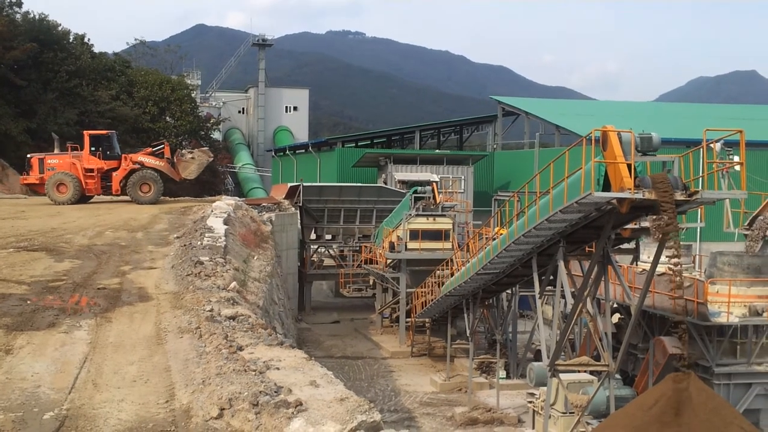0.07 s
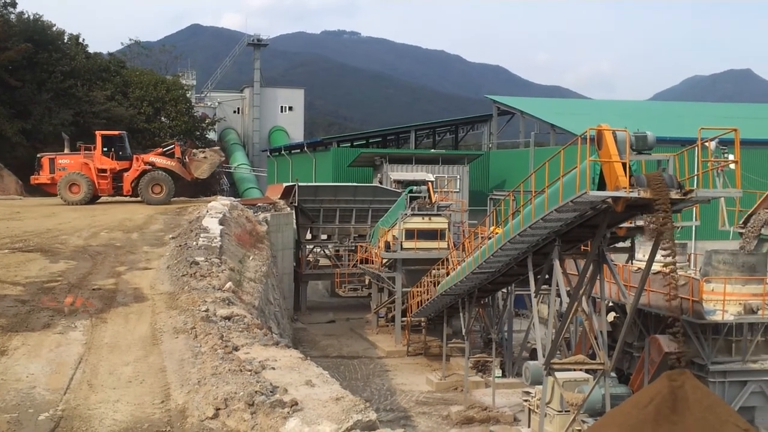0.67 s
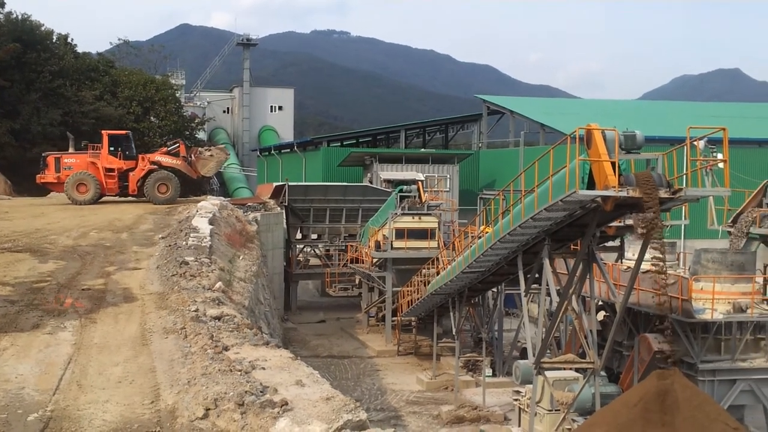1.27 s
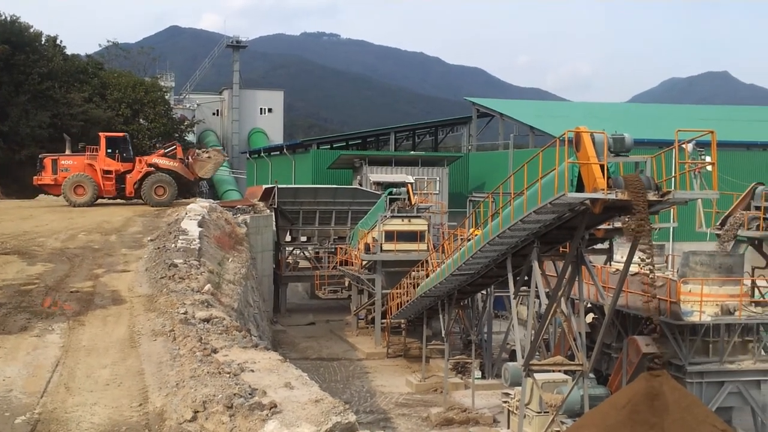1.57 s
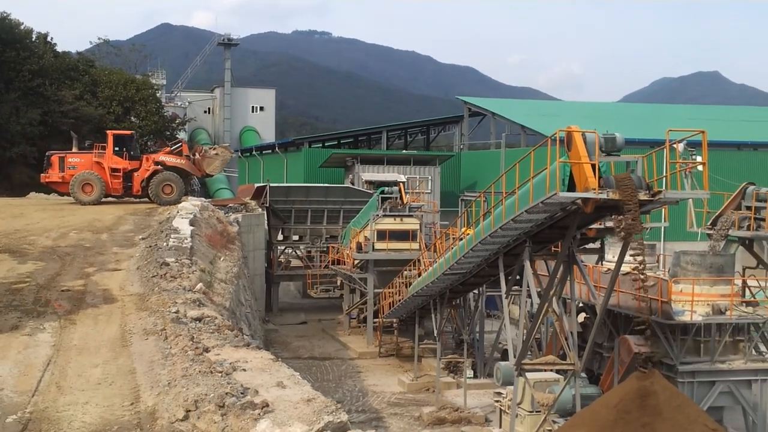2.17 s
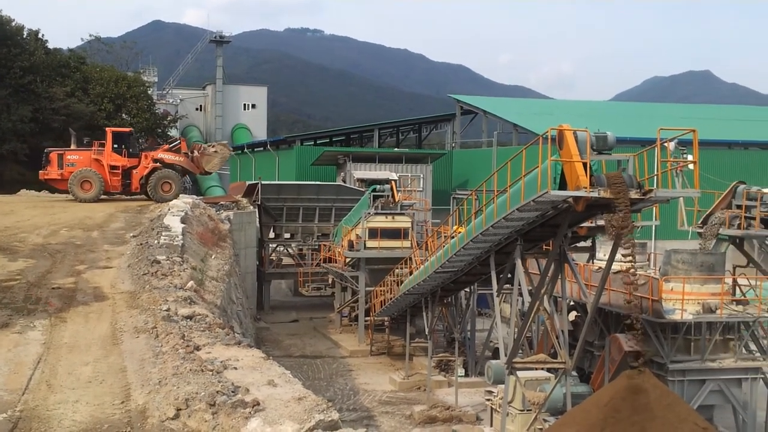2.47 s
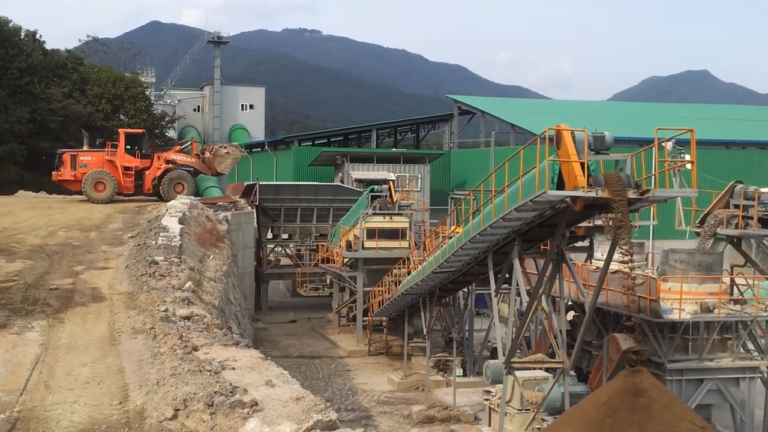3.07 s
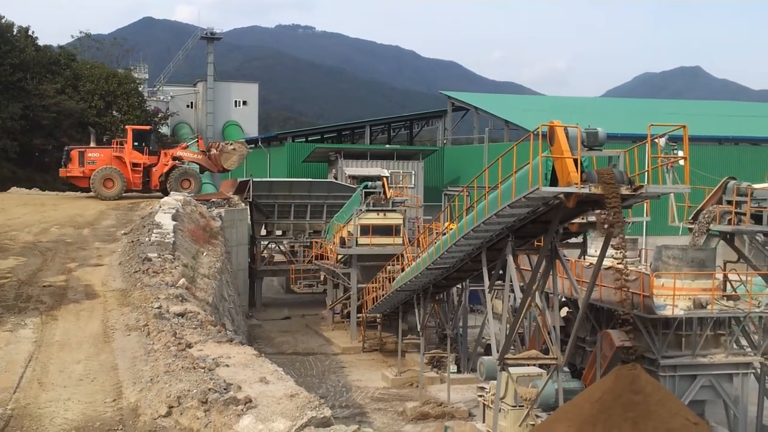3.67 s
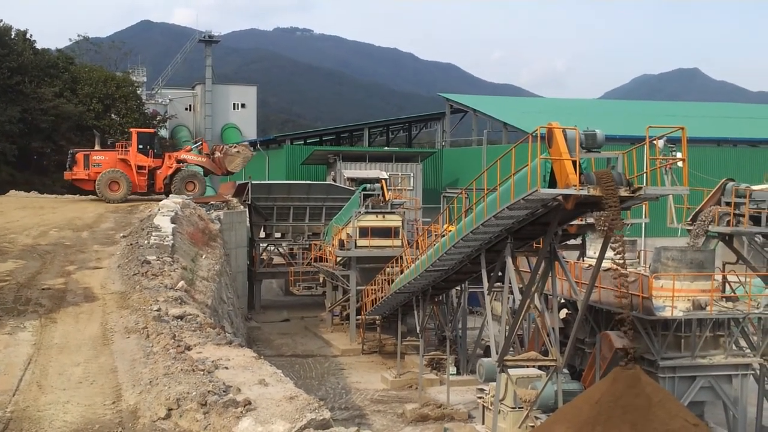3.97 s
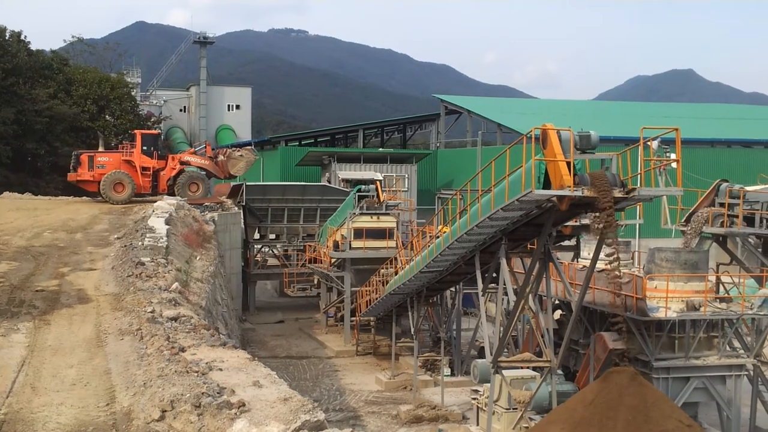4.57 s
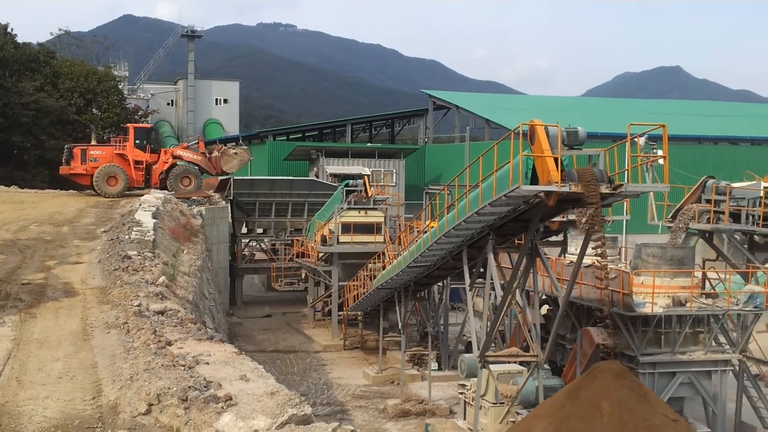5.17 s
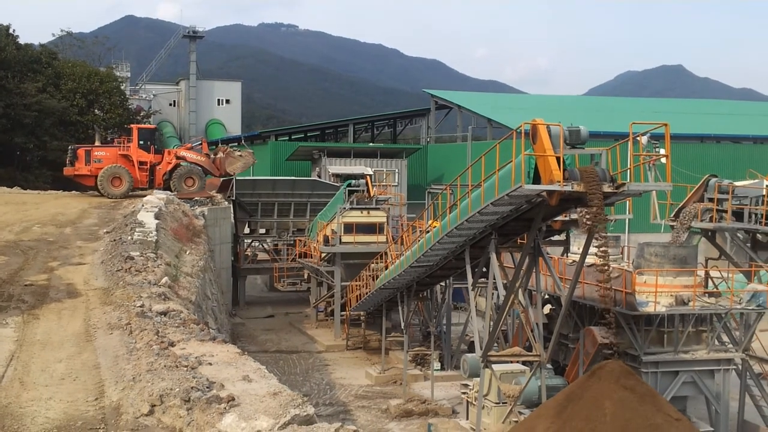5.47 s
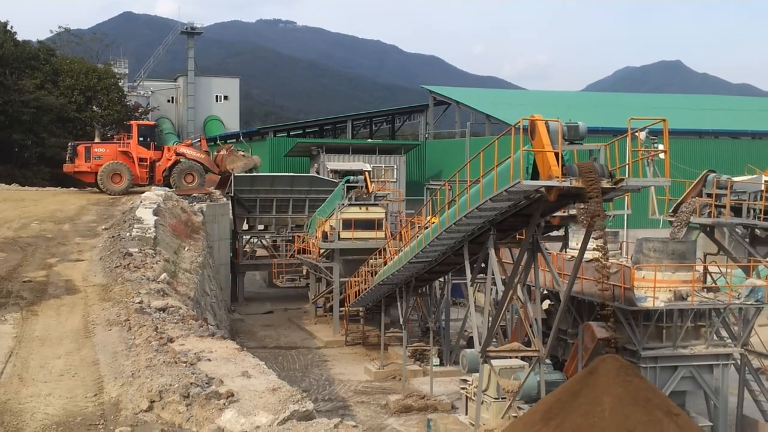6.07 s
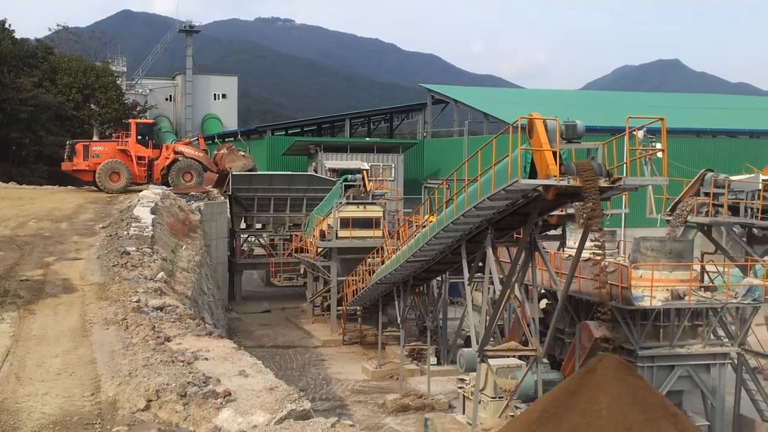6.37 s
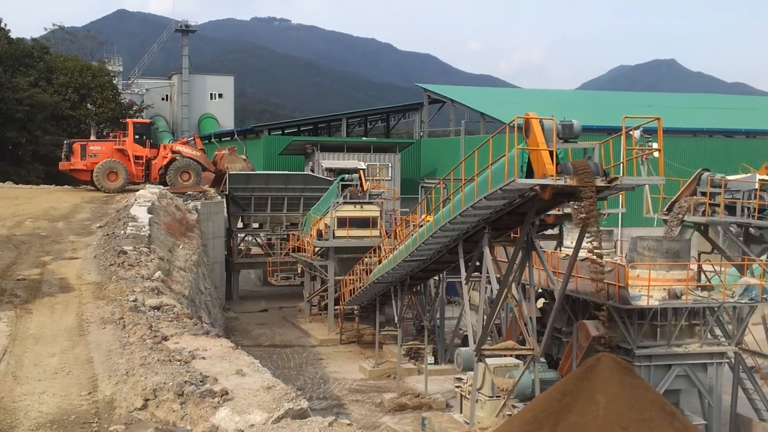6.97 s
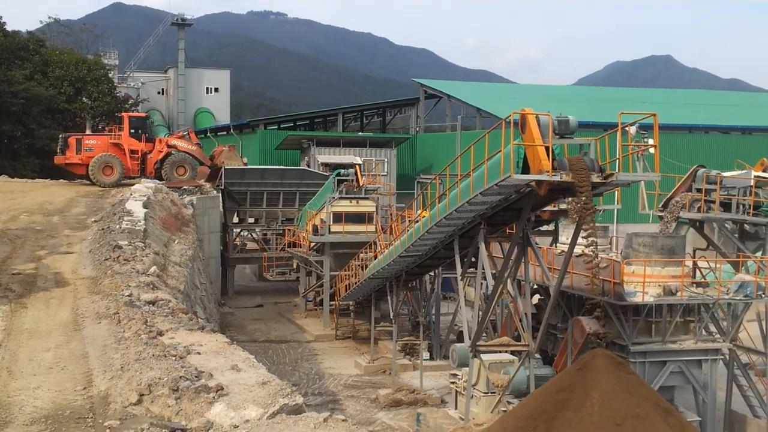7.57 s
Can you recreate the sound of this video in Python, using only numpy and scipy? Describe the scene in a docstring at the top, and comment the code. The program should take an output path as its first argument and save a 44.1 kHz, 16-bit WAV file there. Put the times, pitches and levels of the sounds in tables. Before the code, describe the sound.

A rock crushing plant roars steadily outdoors for about eight seconds. A jaw crusher grinds low, with irregular thuds that are heaviest between 2 and 4.7 seconds. Over it a cone crusher pulses nearly five times a second, with a wavering midrange ring and crisp snapping stone; stronger ringing cracks come around 2.6 and 3.8 seconds. Gravel pours and hops on a vibrating steel screen, making a bright rush with a rapid flutter.

Stray stones clank on a steel chute several times in the first 0.7 seconds, then near 1.3, 2.5, 5.7, 6.1, 7 and 7.7 seconds. Dry chips tick at about 4.6 and 6.4 seconds. Underneath, a wheel loader's diesel drones quietly, sinking in pitch until 2.6 seconds, recovering by 4.3 and easing near the end, beside a pulsing electric motor hum. Walls and sheds give the rock and steel a light, short echo.

```python
"""Thudding, clattering and a rush of gravel over a low drone: a rock crushing plant at a quarry.
A jaw crusher grinds rock against its heavy frame, a cone crusher pinches stones in its ringing bowl
at a slightly quicker beat, and gravel hops on a vibrating steel screen. Stray stones clank on a chute,
a few chips tick off, and walls and sheds throw all this back. Underneath, without echo,
a wheel loader's diesel drones and the jaw crusher's drive motor hums."""
import sys
import numpy as np
from scipy import signal
from scipy.fft import rfft, irfft
from scipy.io import wavfile
from scipy.ndimage import map_coordinates

SR = 44100
rng = np.random.default_rng(int(sys.argv[2]) if len(sys.argv) > 2 else 0)


def to_wav(s):
    """Save 16-bit WAV."""
    ch = np.atleast_2d(s).T  # columns
    pcm = np.round(np.clip(ch, -1, 1) * 32767)  # PCM
    wavfile.write(sys.argv[1], SR, pcm.astype(np.int16))


N = 344421
TIME = np.arange(N) / SR

# each machine's beat: strokes per second, and the time of one crest
JAW_HZ, CONE_HZ, SCREEN_HZ = 4.33, 4.72, 14.31
JAW_CREST_S, CONE_CREST_S, SCREEN_CREST_S = 0.070, -0.006, 0.054


def gain_of(db):
    """Decibels to an amplitude factor."""
    return 10 ** (np.asarray(db) / 20)


def unit_rms(x):
    """Scales to an rms of one."""
    return x / np.sqrt(np.mean(x ** 2) + 1e-20)


def at_hz(spectrum, hz):
    """Reads a table along a log-frequency axis."""
    f, value = np.transpose(spectrum)
    return np.interp(np.log(hz + 1), np.log(f), value)


def curves(rows):
    """The columns of a time table, drawn out to every sample."""
    times, *columns = np.transpose(rows)
    return [np.interp(TIME, times, column) for column in columns]


def add(mix, start, sound):
    """Lays a sound into the mix at start seconds."""
    part = mix[max(round(start * SR), 0):][:len(sound)]
    part += sound[:len(part)]


def wander(hz):
    """Random drift with an rms of one, rolling off above hz."""
    f = np.fft.rfftfreq(N, 1 / SR)
    return unit_rms(irfft(rfft(rng.standard_normal(N)) / (1 + (f / hz) ** 4), N))


def swell(rise):
    """A push that peaks at one after rise seconds and then dies away."""
    age = np.arange(SR // 2) / SR / rise
    return age * np.exp(1 - age)


def resonate(force, spectrum, size=8192):
    """Rings a body with this tone colour, which falls an extra 36 dB an octave beyond the table's ends."""
    hz = abs(np.fft.fftfreq(size, 1 / SR)) + 1
    octaves_below = np.maximum(np.log2(spectrum[0][0] / hz), 0)
    octaves_above = np.maximum(np.log2(hz / spectrum[-1][0]), 0)
    db = np.maximum(at_hz(spectrum, hz) - 36 * (octaves_below + octaves_above), -100)
    minimum_phase = np.exp(np.conj(signal.hilbert(np.log(gain_of(db)))))
    ring = np.fft.ifft(minimum_phase).real[:size // 2]
    return signal.oaconvolve(force, ring / np.linalg.norm(ring))[:N]


def stones(per_s, spread_db):
    """Random impacts of either sign: many small, a few large."""
    size = gain_of(spread_db * np.minimum(rng.exponential(1, N), 3))
    return unit_rms(size * rng.choice([-1., 1.], N) * (rng.random(N) < per_s / SR))


def stroke(hz, crest_s, depth_db, uneven, sharp=1.0):
    """The force of a turning machine: one crest a turn, no two of the same height."""
    crest = np.abs(np.cos(np.pi * hz * (TIME - crest_s))) ** (2 * sharp)
    return unit_rms(gain_of(depth_db * crest * (1 + uneven * wander(hz / 2))))


def jaw_crusher():
    """Each closing of the jaws grinds rock against the heavy frame; large rocks give way with a thud."""
    # how hard the jaws work, heaviest while large rock passes: t/s, level/dB
    workload = [(0.15, -28), (0.75, -30), (1.0, -30), (1.3, -29.5), (1.7, -31), (2.2, -28), (2.7, -30),
                (3.1, -27), (3.35, -28.5), (3.75, -29), (4.1, -29), (4.6, -29), (5.0, -30), (5.4, -30),
                (6.0, -29.5), (6.4, -30), (6.95, -30), (7.3, -30.5), (7.8, -30)]
    # large rocks giving way, each booming a frame panel, and at 1.691 s a brief deep boom at 62 Hz: t/s,
    # relative level/dB, f/Hz, rise/s
    bites = [(0.059, -23, 126.3, 0.033), (.13, -26, 189, .03), (0.3, -23.5, 121, .03),
             (0.975, -23.5, 213, 0.031), (1.691, -31, 62, .075), (2.118, -17, 159.4, 0.041),
             (2.126, -23, 237, 0.028), (2.54, -24, 209, 0.035), (2.81, -20.5, 127, 0.028),
             (3.01, -21, 124, .042), (3.06, -21.5, 203, 0.042), (3.22, -26, 189.6, 0.04),
             (3.49, -19, 253, 0.039), (3.52, -23, 151, 0.024), (3.93, -25, 184.6, 0.026),
             (3.969, -22.5, 123.4, 0.036), (4.191, -18.5, 221, 0.017), (4.245, -25, 155.1, 0.016),
             (4.41, -20, 201, 0.023), (4.675, -18.5, 221, 0.024), (5.809, -27.5, 165.3, 0.045),
             (6.0, -23, 150, 0.022), (6.73, -26, 193, .035), (7.62, -22, 123.5, 0.026)]
    # the frame's tone colour: f/Hz, relative level/dB
    frame_colour = [(22, -39.5), (36, -28.5), (50, -11.5), (66, -8.5), (82, 1), (96, -6), (108, -6.5),
                    (118, -0.5), (130, 3), (140, -2.5), (149, -3), (157, 3.5), (170, -1.5), (200, 2.2),
                    (225, -1), (238, -2), (258, 1.5), (272, -3), (305, -1), (400, -6), (620, -37.5)]
    scatter_db, crunch_db, boom_db = 0.6, -10, -4.5
    grinding = stones(per_s=2000, spread_db=1.5) * stroke(JAW_HZ, JAW_CREST_S, depth_db=1, uneven=0.17)
    load_db = curves(workload)[0] + scatter_db * wander(JAW_HZ / 2)  # no two strokes meet the same rock
    force, panels = grinding * gain_of(load_db), np.zeros(N)
    for start, db, hz, rise in bites:
        thud = swell(rise)
        t = np.arange(len(thud)) / SR
        add(force, start, gain_of(db + crunch_db) * thud * rng.standard_normal(len(t)))
        add(panels, start, gain_of(db + boom_db) * thud * np.sin(2 * np.pi * hz * t))
    return resonate(force, frame_colour) + panels


def cone_crusher():
    """The gyrating head pinches stones once a turn: the bowl booms and the stones snap."""
    # how full the chamber runs: t/s, level/dB
    chamber_load = [(0.0, -21.5), (0.35, -23), (0.62, -24), (0.85, -22), (1.15, -23), (1.35, -22.5),
                    (1.75, -23), (2.3, -23), (3.3, -22), (3.7, -21.5), (4.2, -23), (4.65, -22.5),
                    (4.85, -23.8), (5.1, -23), (5.45, -22.5), (5.8, -22.7), (6.3, -22.5), (6.8, -22.5),
                    (7.4, -22.5), (7.8, -22)]
    # the bowl's pitch, bending as the rock in it shifts: t/s, f/Hz
    bowl_pitch = [(0.0, 719), (0.45, 730.4), (0.9, 720), (1.3, 706), (2.1, 707), (2.7, 712.6), (3.3, 729),
                  (3.9, 722.4), (4.3, 708), (4.9, 717.4), (6.0, 718), (6.4, 715), (7.1, 717), (7.6, 704)]
    # the bowl's tone colour at its resting pitch: f/Hz, relative level/dB
    bowl_colour = [(300, -27.5), (430, -16.5), (470, -6.5), (560, -5.5), (660, -1.4), (730, -1.8),
                   (772, -2), (800, -5), (890, -7.5), (965, -15), (1220, -7), (1390, -10.5), (1510, -20.5),
                   (1900, -32), (3000, -58.5)]
    # crumbling stones that set the bowl ringing: t/s, peak level/dB, f/Hz, rise/s
    cracks = [(.14, -21, 719, 0.023), (.35, -18, 734, 0.023), (.39, -23.5, 767, .025),
              (.69, -18, 781.5, 0.012), (1.04, -18, 712, 0.014), (1.26, -18, 672, 0.012),
              (1.49, -23, 693, 0.023), (1.66, -20, 683, 0.011), (2.106, -20, 640, 0.0085),
              (2.63, -15, 723, 0.007), (2.745, -19, 698, 0.0082), (2.932, -16, 730, 0.0082),
              (3.36, -24, 753, 0.015), (3.59, -23, 702, 0.023), (3.80, -26, 691, .012),
              (3.826, -13, 734, 0.0089), (3.853, -17.5, 768, 0.0058), (3.967, -18, 717, 0.006),
              (4.41, -20, 668, 0.023), (4.435, -21, 756, 0.019), (4.65, -23.5, 664, .016),
              (5.31, -23, 699, 0.013), (5.705, -21, 617, 0.014), (5.77, -21.5, 661, 0.017),
              (5.885, -17, 731, 0.01), (6.735, -19.5, 732, 0.025), (6.88, -18.5, 730.5, 0.016),
              (6.96, -21, 711, 0.013), (7.6, -23, 711, .016)]
    # the tone colour of snapping stone: f/Hz, relative level/dB
    snap_colour = [(1300, -28), (1590, -10.5), (1680, 0), (1820, 4.5), (1950, 0.5), (2040, -4),
                   (2150, -4.5), (2230, 6.5), (2330, 4), (2520, 4.5), (2590, -7), (2700, -9.5),
                   (3400, -22.5), (6000, -49.5)]
    rest_hz, drift_hz, ring_db = 715, 28, -10.5
    load_db, pitch = curves(chamber_load)[0], curves(bowl_pitch)[0]
    pinch = stroke(CONE_HZ, CONE_CREST_S, depth_db=2.2, uneven=0.1)
    boom = resonate(stones(per_s=4500, spread_db=1.5), bowl_colour)
    bent_boom = map_coordinates(boom, [np.cumsum(pitch / rest_hz)], order=3, mode="mirror")
    bowl = gain_of(load_db - 0.45) * pinch * bent_boom
    # the bowl's strongest mode sings on between the blows
    turns = np.cumsum(pitch + drift_hz * wander(29.9)) / SR
    bowl += np.sqrt(2) * gain_of(load_db + ring_db) * np.sin(2 * np.pi * turns)
    for start, db, hz, rise in cracks:
        push = swell(rise)
        t = np.arange(len(push)) / SR
        add(bowl, start, gain_of(db) * push * np.sin(2 * np.pi * hz * t))
    squeeze = stroke(CONE_HZ, CONE_CREST_S, depth_db=3.5, uneven=0.2, sharp=1.1)
    # a fuller chamber snaps louder, and the stones break in clumps
    snap_db = -31.5 + 0.3 * (load_db - load_db.mean()) + 0.5 * wander(17)
    snaps = stones(per_s=4500, spread_db=2.5) * squeeze * gain_of(snap_db)
    return bowl + resonate(snaps, snap_colour)


def vibrating_screen():
    """Gravel pours from belts and hops on the deck once a shake; larger stones ring the steel."""
    # clumps that drop from a belt onto the deck: t/s, relative level/dB, rise/s
    spills = [(.17, -32, .025), (.84, -33.5, 0.016), (1.3, -30, .02), (1.37, -29, 0.014), (2.09, -27, .025),
              (2.43, -31, 0.056), (3.51, -28.5, 0.036), (4.15, -29, 0.043), (4.3, -33, 0.019),
              (4.56, -29, 0.024), (5.05, -32, 0.062), (5.81, -31, 0.031), (6.325, -31, .018),
              (6.92, -27, 0.033), (7.22, -39, .025)]
    # the steel deck's modes: f/Hz, relative level/dB, t60/s
    deck_modes = [(1854, -50, 0.078), (2215, -43.5, 0.14), (2535, -49, 0.098), (3120, -45, 0.055),
                  (3770, -53.5, 0.056), (4560, -49.5, 0.046), (4960, -44, 0.06), (5230, -50, 0.064)]
    # the gravel's tone colour: f/Hz, relative level/dB
    gravel_colour = [(700, -17.5), (1500, -0.5), (1850, 5), (2750, 2), (3130, 3.5), (3350, 0), (3580, -1.5),
                     (3780, -0.6), (4030, -1), (4500, 3), (4780, 0.4), (4980, 1.8), (5230, -1.5),
                     (5400, 0.8), (5670, -1.5), (5950, -1), (6230, -7), (6420, -9.5), (7000, -17.5),
                     (7600, -30)]
    # how much gravel lies on the deck: t/s, gain/dB
    deck_load = [(0.0, -0.4), (0.6, -0.5), (0.85, 0.8), (1.2, -1.5), (1.9, -0.2), (2.35, -0.7), (3.1, -0.3),
                 (3.8, -0.05), (4.55, 0), (5.0, 0), (5.8, -0.5), (6.6, -0.3), (6.95, 0), (7.3, 0.2),
                 (7.8, -0.5)]
    landing = stroke(SCREEN_HZ, SCREEN_CREST_S, depth_db=4.7, uneven=0.1, sharp=2.4)
    hops = stones(per_s=16000, spread_db=1.5) * landing * gain_of(-26.5)
    pour = stones(per_s=18000, spread_db=3.5) * gain_of(-28.5)
    clumps = np.zeros(N)
    for start, db, rise in spills:
        add(clumps, start, gain_of(db) * swell(rise))
    pour += clumps * stones(per_s=2700, spread_db=5.5)
    steel, t = np.zeros(N), np.arange(SR // 4) / SR
    for hz, db, t60 in deck_modes:
        ring = gain_of(-60 * t / t60) * np.sin(2 * np.pi * hz * t)
        strikes = stones(per_s=83, spread_db=4.0) * landing
        steel += gain_of(db) * unit_rms(signal.oaconvolve(strikes, ring)[:N])
    return (resonate(hops + pour, gravel_colour) + steel) * gain_of(curves(deck_load)[0])


def loader_diesel():
    """The diesel's firing note sags as the loader lifts, recovers and eases off; its overtones are weak."""
    # the firing note: t/s, f/Hz, level/dB
    firing = [(0.0, 57.5, -32), (0.5, 57.9, -38), (1.05, 55.4, -34), (1.35, 53.1, -43), (1.8, 51.1, -38),
              (2.35, 46.78, -39.5), (2.62, 46.02, -47), (2.85, 48.5, -38), (3.15, 52.03, -38),
              (3.7, 57.6, -47), (4.28, 61.1, -33.5), (4.7, 60.3, -39), (5.35, 59.6, -39),
              (5.6, 59.3, -34.5), (5.85, 59.7, -39), (6.05, 57.4, -37), (6.35, 56.8, -34), (6.6, 60.5, -41),
              (7.05, 58.5, -33.5), (7.35, 54.63, -43), (7.8, 53, -38)]
    hz, db = curves(firing)
    phase = 2 * np.pi * np.cumsum(hz) / SR
    note = np.sin(phase) + gain_of(-14.5) * np.sin(2 * phase) + gain_of(-9.5) * np.sin(4 * phase)
    return gain_of(db) * note


def drive_motor(hum_hz=238, drift_hz=1.2):
    """The electric drive hums, louder each time the jaws close and load it."""
    # the hum's slow rise and fall: t/s, level/dB
    hum_level = [(0.0, -41.5), (1.5, -41.5), (3.1, -39), (4.4, -38.5), (5.4, -42), (6.2, -40), (7.1, -36.5),
                 (7.8, -43)]
    turns = np.cumsum(hum_hz + drift_hz * wander(3)) / SR
    strain = stroke(JAW_HZ, JAW_CREST_S, depth_db=7, uneven=0.2)
    return np.sqrt(2) * gain_of(curves(hum_level)[0]) * strain * np.sin(2 * np.pi * turns)


def chute_clanks(attack_s=0.0019):
    """Stray stones clank on steel, at a pitch set by where they land; those that skid roughen the ring."""
    # stones striking the chute: t/s, level/dB, base f/Hz, t60/s, roughness 0-1
    knocks = [(.03, -31, 2220, .25, .2), (.154, -25, 2234, 0.2, 0.3), (.165, -26, 1840, 0.069, 0.8),
              (.167, -23.5, 2250, .36, 0.4), (.195, -27, 2540, 0.1, 0.9), (.203, -28, 2267, 0.26, .8),
              (.275, -35, 4700, 0.071, 0.45), (.36, -24.5, 1850, 0.13, 0.7), (.655, -27, 2240, .07, 0.8),
              (1.27, -25, 1900, 0.15, .9), (2.55, -29, 2220, 0.07, .9), (5.705, -25, 1854, 0.074, 0.89),
              (6.129, -22, 2420, 0.084, .9), (6.97, -24, 1860, 0.07, .6), (7.667, -21, 2957, 0.038, .7)]
    # the chute plate's modes: ratio to the base frequency, gain/dB
    plate_modes = [(0.815, -9), (0.998, 5.5), (1.11, -13), (1.369, -20.5), (1.65, -11)]
    out, t = np.zeros(N), np.arange(SR // 3) / SR
    skid = wander(280)
    for start, db, hz, t60, rough in knocks:
        steel = sum(gain_of(mode_db) * np.sin(2 * np.pi * hz * ratio * t) for ratio, mode_db in plate_modes)
        scrape = 1 - rough / 2 + rough * np.roll(skid, -round(start * SR))[:len(t)]
        envelope = gain_of(db - 60 * t / t60) * (1 - np.exp(-t / attack_s))
        add(out, start, envelope * steel * scrape)
    return out


def stone_chips(rise_s=0.002, jitter_hz=450):
    """A splinter of stone snaps off with a dry tick of a few milliseconds and does not ring."""
    # the splinters: t/s, level/dB, centre f/Hz
    ticks = [(4.585, -31, 4400), (4.6, -31, 4600), (6.386, -23, 5550), (6.405, -32, 5500)]
    out, snap = np.zeros(N), swell(rise_s)
    for start, db, hz in ticks:
        turns = np.cumsum(hz + jitter_hz * wander(1500)[:len(snap)]) / SR
        add(out, start, np.sqrt(2) * gain_of(db) * snap * np.sin(2 * np.pi * turns))
    return out


def yard_echo(sound, tails=3, echoes_per_s=2000):
    """Scattered echoes from walls and sheds, the treble dying first; moving air shifts their paths."""
    # how long the yard rings: f/Hz, t60/s
    decay = [(100, 1), (700, 0.8), (2500, 0.24), (7000, 0.47)]
    out, size = np.zeros(N), SR // 2
    for k in range(tails):
        taps = rng.choice([-1., 1.], size) * (rng.random(size) < echoes_per_s / SR)
        taps *= np.arange(size) > SR // 100  # 10 ms of pre-delay
        hz, t, bands = signal.stft(taps, SR, nperseg=256)
        fade = gain_of(-60 * t / at_hz(decay, hz)[:, None])
        tail = signal.istft(bands * fade, SR, nperseg=256)[1]
        # the sound crossfades from tail to tail as the paths shift
        share = np.sqrt(2 / tails) * np.cos(np.pi * (1.288 * TIME + k / tails))
        out += signal.oaconvolve(sound * share, tail / np.linalg.norm(tail))[:N]
    return out


def scene():
    """The rock and steel with their echo, over the dry diesel and motor; alike in both channels."""
    plant = jaw_crusher() + cone_crusher() + vibrating_screen() + chute_clanks() + stone_chips()
    mono = plant + gain_of(-14.0) * yard_echo(plant) + loader_diesel() + drive_motor()
    return np.array([mono, mono])


def record(dry):
    """A steep low-pass takes off the top of the treble."""
    cutoff_hz = 7560
    low_pass = signal.firwin(511, cutoff_hz, window=("kaiser", 9), fs=SR)
    return signal.oaconvolve(dry, low_pass[None], "same")


dry = scene()
out = record(dry)
to_wav(out)
```